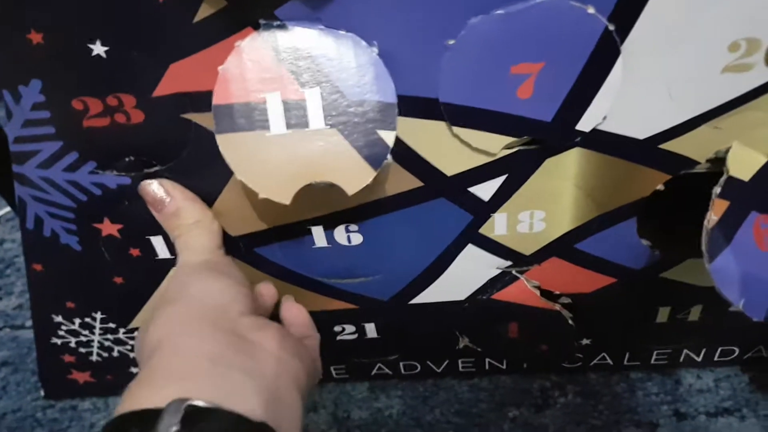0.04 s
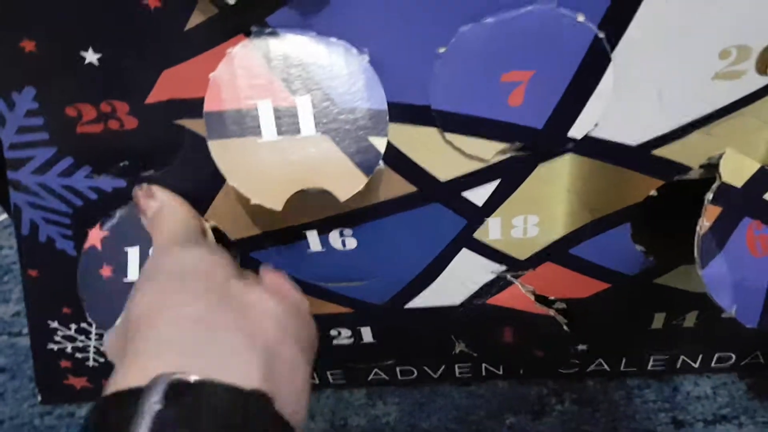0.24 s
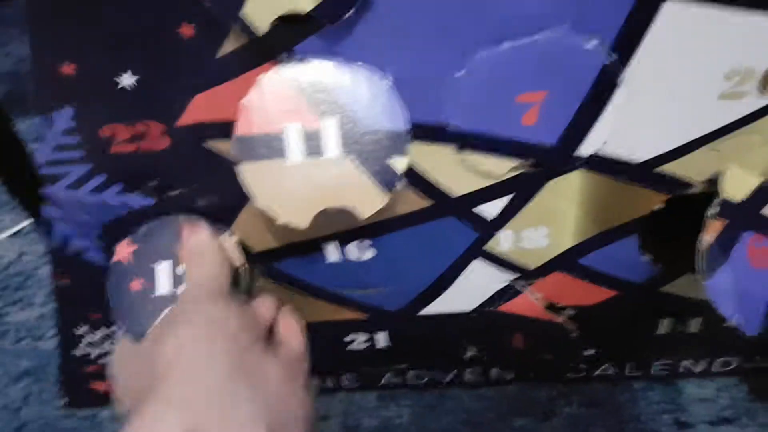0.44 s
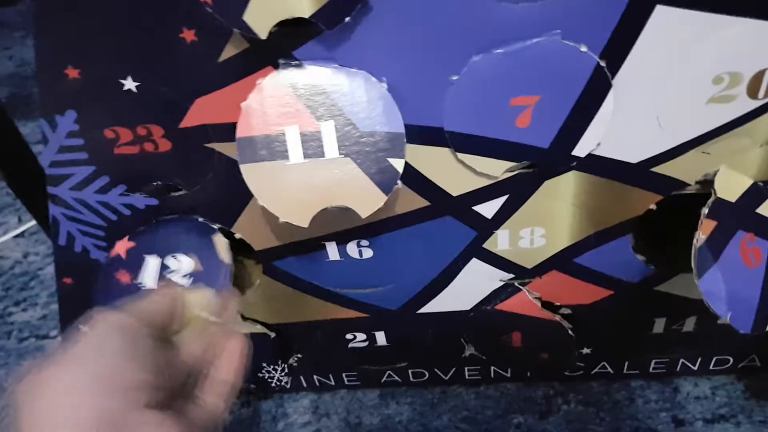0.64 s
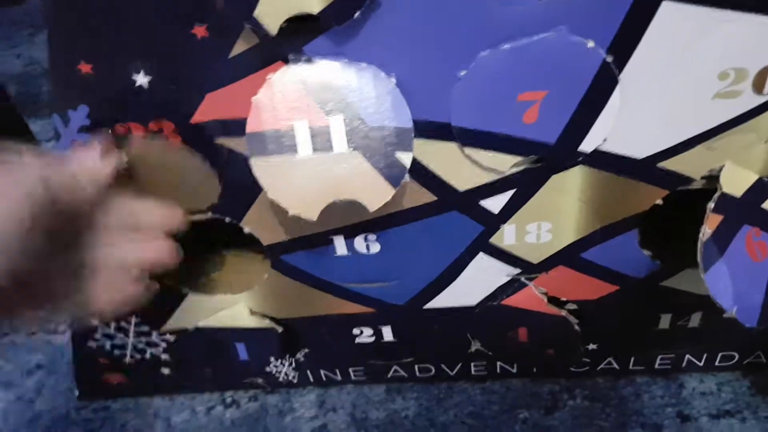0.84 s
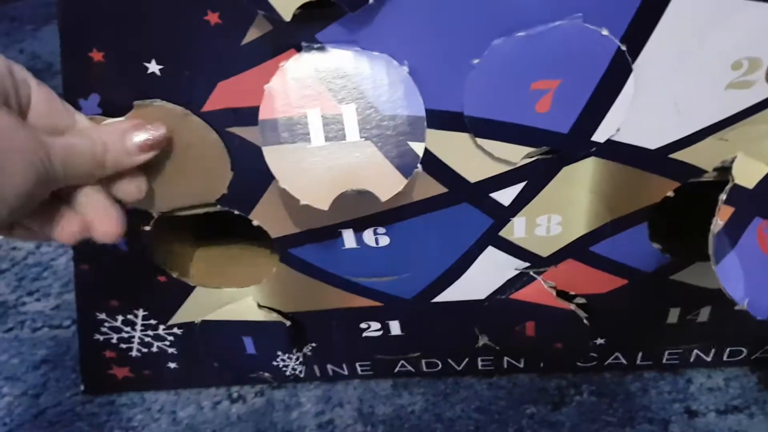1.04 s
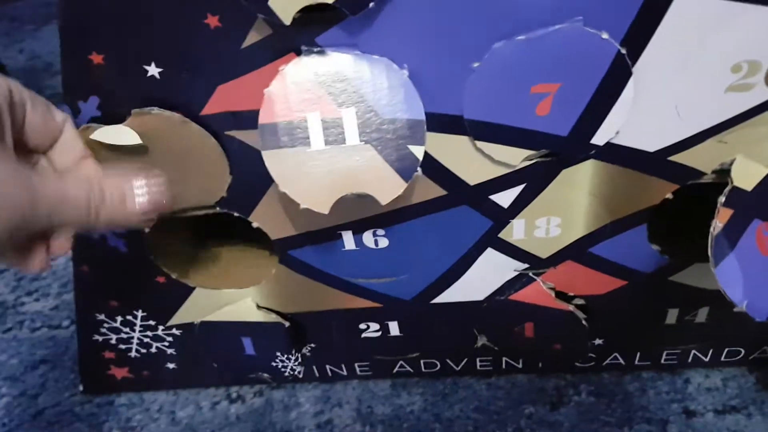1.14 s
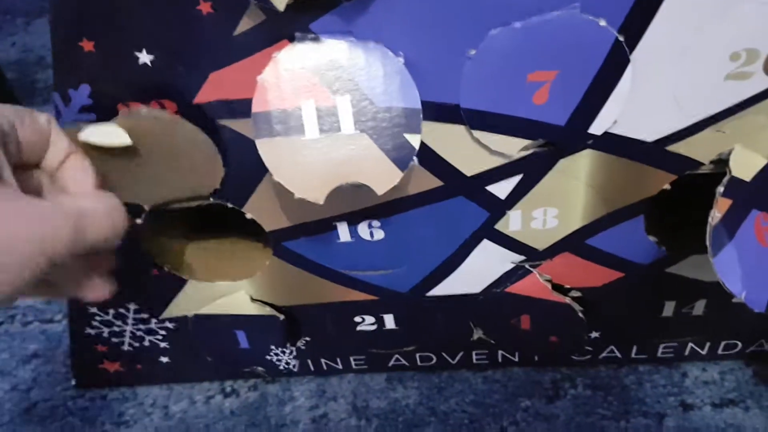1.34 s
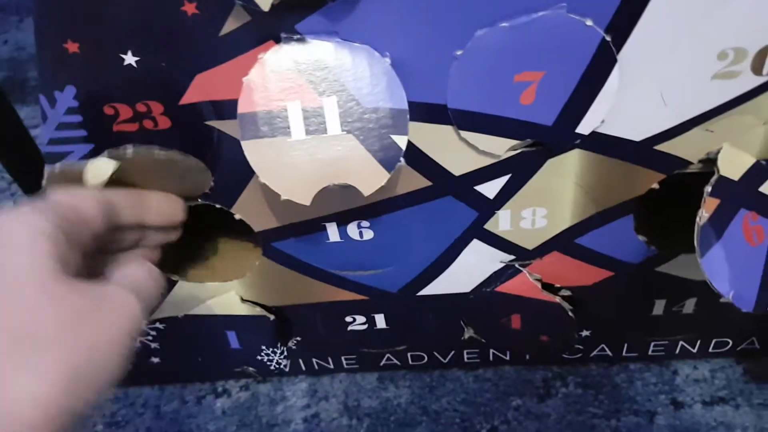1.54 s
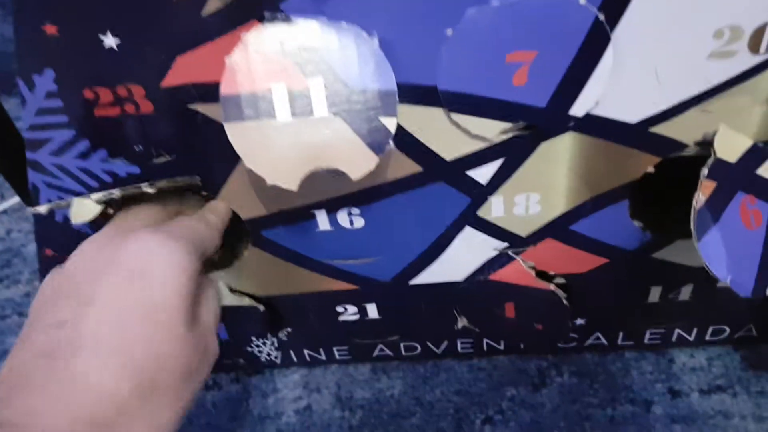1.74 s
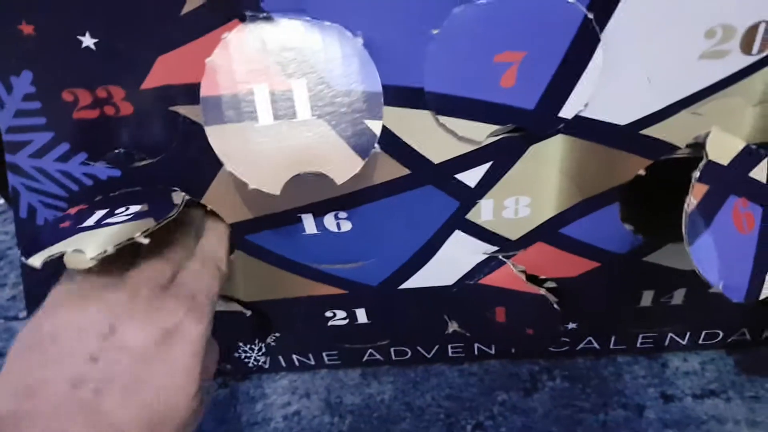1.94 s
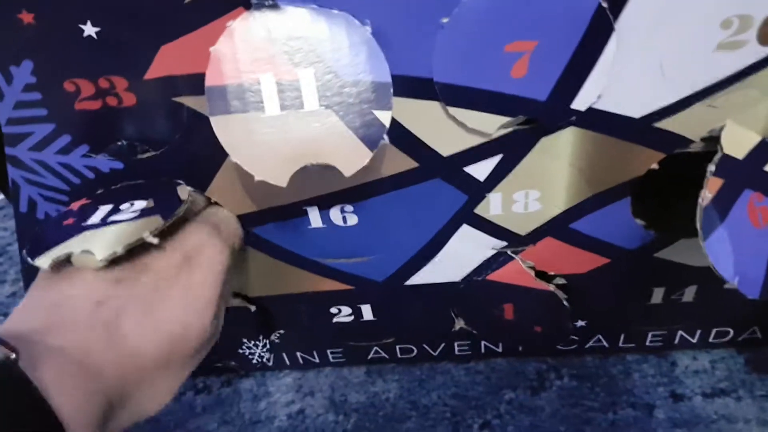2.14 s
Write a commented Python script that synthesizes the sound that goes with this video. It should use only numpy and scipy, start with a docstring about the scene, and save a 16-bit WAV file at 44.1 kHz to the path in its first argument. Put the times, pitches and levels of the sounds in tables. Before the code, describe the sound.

Fingers pop open a perforated cardboard door with a loud crack, then faint knocks and rubbing

```python
"""Fingers pry open a perforated door in a hollow cardboard box, close to a two-port phone microphone.
Light knocks and a rumble come first; within a quarter second the tab pops loudly as knocks and snaps pile up.
Sparse knocks and snapping fibres follow, then fingers slide more strongly on the card until 2.2 s.
Knocks drive panel and cavity modes, snaps are grainy noise bursts, and sliding is coloured noise and modes.
A small carpeted room answers the knocks and snaps briefly."""
import sys
import numpy as np
from scipy import signal
from scipy.fft import rfft, irfft, next_fast_len
from scipy.io import wavfile
from scipy.ndimage import uniform_filter1d

SR = 44100
rng = np.random.default_rng(int(sys.argv[2]) if len(sys.argv) > 2 else 0)


def wrap_up_sound(samples):
    """Save the sound to the file named by the first command line argument, as 16-bit audio."""
    columns = np.atleast_2d(samples).T
    # keep every value between -1 and 1, then stretch to whole-number steps
    tamed = np.clip(columns, -1, 1)
    steps = np.round(tamed * 32767).astype(np.int16)
    wavfile.write(sys.argv[1], SR, steps)


N = 97020  # 2.2 s

# Colour tables hold nominal gains: colour() applies 0.94 of each unless told otherwise.
# small carpeted room: (frequency [Hz], gain [dB])
ROOM_COLOUR = [(60, -4), (300, -4.5), (1200, -4.5), (4000, 5), (9000, -0.5), (16000, -2.5)]
# hand pressing and shifting the box: (time [s], rumble level [dB])
HANDLING = [(0, -44), (.07, -52.5), (.15, -62), (0.329, -43), (.42, -61), (.5, -53), (.57, -69.5),
            (.65, -61), (.735, -47.5), (.77, -61.5), (0.851, -62.5), (0.932, -48.5), (1.05, -53.5),
            (1.101, -60), (1.299, -59), (1.431, -55), (1.549, -53), (1.67, -49), (1.75, -47.5), (1.83, -45),
            (1.949, -41), (2.041, -56), (2.09, -57.5), (2.2, -48)]
# rumble in the box: (frequency [Hz], gain [dB])
RUMBLE_COLOUR = [(20, -9), (59, -6.5), (95, 2), (125, 5.5), (167, 2), (241, 1.5), (295, -12.5), (445, -6.5),
                 (506, -30.5), (600, -20.5), (780, -53), (1320, -120)]
# fingers sliding on card: (time [s], top level [dB], treble level [dB], middle level [dB])
SLIDE = [(0, -69, -79, -56.5), (.08, -78.5, -73.5, -70), (.16, -74.5, -78.5, -66),
         (0.359, -79, -59.5, -61.5), (.47, -73, -79, -65.5), (.53, -84.5, -84, -76),
         (0.601, -83.5, -82, -76), (.64, -74.5, -74, -61.5), (0.759, -68, -70.5, -75.5),
         (.8, -67.5, -67, -59.5), (.87, -63.5, -67, -62), (.95, -64, -69.5, -64),
         (1.061, -69.5, -72, -61.5), (1.087, -82, -80, -72.5), (1.15, -79, -77, -68),
         (1.164, -62, -61.5, -59), (1.185, -64.5, -69.5, -75), (1.21, -75.5, -75, -67),
         (1.269, -75, -64.5, -66), (1.391, -65, -59.5, -61.5), (1.49, -65, -56.5, -60.5),
         (1.52, -57, -59, -58), (1.57, -59.5, -56.5, -63.5), (1.65, -55, -54.5, -51),
         (1.73, -61.5, -56.5, -48), (1.76, -65, -62, -54), (1.788, -62.5, -59.5, -48),
         (1.84, -66.5, -65.5, -55.5), (1.89, -67.5, -69, -55.5), (1.97, -60.5, -66, -43.5),
         (1.999, -90.5, -76.5, -59.5), (2.059, -75.5, -72.5, -74), (2.067, -61, -60.5, -52),
         (2.11, -62, -56, -42), (2.149, -56, -52.5, -50.5), (2.2, -62, -60.5, -47.5)]
# top hiss of the slide: (frequency [Hz], gain [dB])
TOP_COLOUR = [(3820, -35), (5500, -4.5), (6800, -7), (7800, -8.5), (8740, -3), (9270, -3.5), (10000, -3.5),
              (12500, -2), (15700, -3), (15900, -43)]
# treble scrape of the slide: (frequency [Hz], gain [dB])
SCRAPE_COLOUR = [(820, -54), (1400, -24), (1710, -5.5), (2060, -12), (2370, -1), (2670, 1), (2860, -3.5),
                 (3080, -7), (3520, -4.5), (4000, -11), (4970, -12.5), (5350, -17), (7000, -25),
                 (9100, -54)]
# narrow bands of rubbed card: (centre [Hz], noise smoothing [s], mean level [dB])
RUB_BANDS = [(2000, 0.007, -0.5), (2410, .005, -1), (2840, 0.0068, 0.5), (3520, .005, -5),
             (4710, 0.003, -4), (11200, 0.0017, -8), (13600, 0.0025, -5.5)]
# narrow hiss while fingers rub inside the opening: (time [s], level [dB])
WHISPER = [(1.9, -93), (1.93, -59), (1.96, -61.5), (1.99, -78), (2.06, -89), (2.069, -63), (2.11, -56),
           (2.13, -61), (2.155, -56.5), (2.2, -63)]
# box panel modes: (frequency [Hz], relative level [dB], longest decay by 60 dB [s])
PANELS = [(436.5, -11.5, 0.036), (571.3, -5.5, .06), (670.2, -3.5, 0.034), (755, -3.5, 0.077),
          (936.6, 0.5, 0.023), (1023.5, -1.5, 0.035), (1225, 4.5, 0.009), (1394, 0.5, 0.02),
          (1700.4, -6.5, 0.03), (1874, -6.5, 0.027), (1977, -11.5, 0.018), (2166, -18, 0.023),
          (2359, -7.5, 0.02), (2736, -11.5, 0.014), (3194, -16, 0.013)]
# knocks on the box: (time [s], thump peak [dB], thump pitch [Hz], panel peak [dB], thump decay by 60 dB [s],
#   contact time to greatest force [s], panel tilt [dB per octave], favoured panel pitch [Hz])
KNOCKS = [(0.001, -40.5, 184.7, -33.5, 0.1, 0.0012, -15, 775),
          (0.023, -28.5, 287, -35, 0.021, 0.0024, -16, 550),
          (0.047, -37, 252.7, -48.5, 0.039, 0.0018, -4, 550),
          (0.179, -33.5, 312, -35, 0.036, 0.0062, -5, 530), (0.238, -8, 182, 3.5, 0.05, 0.0045, -0.5, 1190),
          (0.247, -8.5, 316, -11, 0.035, 0.0046, -5, 760),
          (0.258, -17.5, 125, -9.5, 0.037, 0.0021, -24, 440),
          (0.273, -13, 196, -4.5, 0.045, 0.0019, 1, 1270),
          (0.305, -29, 127.4, -25.5, 0.047, 0.0021, -10, 610),
          (0.317, -36.5, 155.4, -28.5, 0.08, 0.0044, -3, 1280),
          (0.427, -39, 181.6, -41.5, 0.11, 0.0053, -5.5, 444),
          (0.474, -39.5, 178.1, -46, 0.092, 0.0047, -7, 421),
          (0.623, -51, 136.6, -47, 0.12, 0.003, -1.5, 1037),
          (0.687, -22.5, 390.3, -26, 0.034, 0.0036, 5.5, 1000),
          (0.705, -37.5, 215.4, -44.5, 0.052, 0.0056, -9, 440),
          (0.733, -53.5, 119.4, -37, 0.066, 0.0018, -6, 1050),
          (0.81, -45, 213.5, -35.5, 0.12, 0.0049, 7.5, 770),
          (0.893, -28.5, 182.7, -36.5, 0.088, 0.0031, 8.5, 1310),
          (1, -44.5, 190, -38, 0.08, 0.0033, 2, 1036), (1.03, -43.5, 193.6, -43.5, 0.056, 0.0022, -3, 411),
          (1.176, -51.5, 92.2, -48, 0.18, 0.0058, 3.5, 999),
          (1.599, -35, 135.8, -51, 0.087, 0.0022, 5, 453.6),
          (1.633, -24.5, 167.6, -26.5, 0.14, 0.0057, -1, 1010),
          (1.646, -33, 161.9, -35, 0.29, 0.0025, 7, 1030), (1.699, -31.5, 195.4, -45, 0.1, 0.026, -10, 434),
          (1.724, -31, 201.8, -63, 0.033, 0.0042, 3, 430), (1.782, -35.5, 148.3, -38, 0.2, 0.0068, -6, 440),
          (1.892, -34.5, 235.4, -38, 0.33, 0.018, -6, 1290),
          (1.921, -46.5, 155.3, -12.5, 0.069, 0.0042, 5.5, 945),
          (1.941, -26.5, 228.3, -20, 0.07, 0.00097, -20.5, 393),
          (2.13, -28.5, 248, -32.5, 0.091, 0.015, -10.5, 430)]
# snapping fibres: (time [s], peak [dB], decay to 1/e [s], nominal tilt [dB per octave], favoured pitch [Hz])
SNAPS = [(0.086, -47, 0.0015, 6, 10000), (0.2166, -40.5, 0.0033, -2.5, 4200),
         (0.2377, -14, 0.0054, -4, 2470), (0.241, 0, 0.0024, -2.5, 2360), (.247, -14.5, 0.0048, -5, 4420),
         (0.2716, -12.5, 0.0049, -0.5, 8140), (0.2769, -18, 0.0042, 0, 2580),
         (.389, -46, 0.0016, 10, 12000), (0.404, -47, 0.0016, 2, 11000), (0.4293, -48.5, 0.0018, 4, 11100),
         (0.4667, -45, 0.0022, -3, 2854), (.623, -43.5, 0.0011, 1, 13530), (.6525, -39.5, 0.0022, 1, 13300),
         (0.687, -29.5, 0.0019, 0, 4460), (0.733, -36.5, 0.0021, 1, 2640), (0.8102, -35.5, 0.0017, 3, 9650),
         (0.816, -29, 0.0022, 4.5, 9060), (0.895, -31.5, 0.0021, -3, 3840), (0.965, -41, 0.0045, 2, 4400),
         (1.001, -40, 0.0045, 2, 2307), (1.632, -24.5, 0.00088, 7.5, 15400),
         (1.6335, -19, 0.0015, -1.5, 4840), (1.786, -40, 0.0082, -2, 3000), (1.896, -33.5, 0.0033, 4, 6670),
         (1.9002, -33, 0.0014, -5.5, 3470), (1.923, -31, 0.0031, -5, 8800),
         (2.0668, -44.5, 0.0012, 3.5, 9350)]
# general colour of snaps: (frequency [Hz], gain [dB])
SNAP_COLOUR = [(1000, -33.5), (2000, -1.5), (3000, -7), (4000, -8), (5000, -8), (7300, -15), (10000, -6),
               (13000, -9.5), (15600, -12), (16500, -34.5)]
# port balance, a share added at left and taken off at right: (frequency [Hz], gain [dB])
PORT_BALANCE = [(60, -3), (110, -0.5), (200, -2), (380, 0.5), (700, 1), (1290, -2), (2380, 2.5),
                (4400, 4.5), (8120, 4.5), (15000, 5)]

ROOM_T60_S, TREBLE_T60_S = 0.22, 0.14
ROOM_DB, ROOM_RISE_S = -9.5, 0.0054  # tail level before its colour; time to swell in
# Samples by which left lags right; negative means left hears it first.
THUMP_LAG, PANEL_LAG, SNAP_LAG, SLIDE_LAG = -6, -9.5, -7, -7
# Amplitude of the part that differs between ports: 0 is shared, 1 is unrelated.
RUMBLE_SPREAD, RUB_SPREAD, SLIDE_SPREAD, TOP_SPREAD, SNAP_SPREAD = 0.17, 0.38, 0.72, 1, 0.96
RUB_BANDS_DB, RUB_DRIFT = -4, 0.041  # level against the scrape noise; low-frequency limit of relative wander
WHISPER_HZ, WHISPER_T60_S = 9000, 0.0027
SCATTER_DB, PANEL_TURN_RAD = 3, 0.78  # random panel level; random phase difference between ports
FAVOUR_DB, FAVOUR_OCT = 7, 0.11  # boost around the favoured panel pitch
RING_CYCLES = 55  # longest panel decay by 60 dB, in cycles
THUMP_LATE_S, GRIT = 0.003, 0.98  # thump starts after the panels; noise amplitude in the contact
SNAP_LEAD_S, SNAP_RISE_S = 0.012, 0.0004  # space ahead of the peak; rise from 1/e
SNAP_RING_DB, SNAP_RING_OCT = 8, 0.15  # nominal boost around the favoured snap pitch
MIC_LOW_HZ, MIC_TOP_HZ, BALANCE_SHARE = 49.7, 16300, 0.65


def undb(db):
    """Turn decibels into amplitude."""
    return 10 ** (np.asarray(db, float) / 20)


def unit(x):
    """Scale to an RMS of 1."""
    return x / np.sqrt(np.mean(x ** 2))


def peak(x, db):
    """Scale the largest sample to a level in dB."""
    return x * undb(db) / np.max(np.abs(x))


def colour(x, table, share=0.94):
    """Filter by a share of the (Hz, dB) points, joined on a log axis."""
    points = np.array(table, float)
    size = next_fast_len(x.shape[-1] + 512)
    f = np.arange(size // 2 + 1) * SR / size + 1
    gain_db = share * np.interp(np.log(f), np.log(points[:, 0] + 1), points[:, 1])
    return irfft(rfft(x, size) * undb(gain_db), size)[..., :x.shape[-1]]


def lift(hz, centre_hz, db, octaves):
    """Bell-shaped boost in dB around a centre."""
    return db * np.exp(-0.5 * (np.log2(hz / centre_hz) / octaves) ** 2)


def ring(x, hz, t60, turn=0):
    """One damped mode, its phase turned by some radians."""
    pole = np.exp(2j * np.pi * hz / SR - np.log(1000) / (t60 * SR))
    return (signal.lfilter([1], [1, -pole], x) * np.exp(1j * turn)).imag


def walk(rate):
    """Random levels held 1 / rate s and smoothed twice; RMS near 1."""
    hold = int(SR / rate)
    steps = np.repeat(rng.standard_normal(N // hold + 1), hold)
    return unit(uniform_filter1d(uniform_filter1d(steps, hold), hold)[:N])


def level(table, column):
    """Amplitude over time, joined in dB between the table's points."""
    points = np.array(table).T
    return undb(np.interp(np.arange(N) / SR, points[0], points[column]))


def spread(make, lag, share):
    """Shared sound with a lag plus a part of its own at each port."""
    both = make()
    shared = np.array([np.roll(both, int(lag)), both])
    return shared * np.sqrt(1 - share ** 2) + share * np.array([make(), make()])


def add(out, x, s, lag):
    """Place a sound; one port hears it a few samples late."""
    ports = x * np.ones((2, 1))
    for port, late in enumerate((lag / 2, -lag / 2)):
        i = max(int(round(s * SR + late)), 0)
        out[port, i:i + x.shape[-1]] += ports[port, :N - i]


def room(x):
    """Short diffuse tail, unrelated at the two ports; the treble dies first."""
    t = np.arange(SR // 2) / SR
    noise = rng.standard_normal((2, len(t)))
    low = colour(noise, [(1500, -6.0), (5000, -25.5)])
    tail = low * undb(-60 * t / ROOM_T60_S) + (noise - low) * undb(-60 * t / TREBLE_T60_S)
    tail = tail * np.clip(t / ROOM_RISE_S, 0, 1)
    tail = colour(tail / np.sqrt(np.sum(tail ** 2) / 2), ROOM_COLOUR)
    return undb(ROOM_DB) * signal.fftconvolve(x, tail, axes=1)[:, :N]


def handling():
    """A hand presses and shifts the box: low noise, slightly uneven, rumbles in the cavity."""
    lumps = undb(1.2 * walk(40))

    def rumble():
        return unit(colour(rng.standard_normal(N) * lumps, RUMBLE_COLOUR))

    return spread(rumble, THUMP_LAG, RUMBLE_SPREAD) * level(HANDLING, 1)


def rub_bands(grain):
    """Narrow bands of the rubbed card; each wanders in pitch and strength as the finger moves."""
    out = 0
    for hz, smooth, db in RUB_BANDS:
        band = unit(uniform_filter1d(rng.standard_normal(N) * grain, int(smooth * SR)))
        strength = undb(db + 2.5 * walk(3))
        # high bands wander by a smaller share
        pitch = hz * (1 + RUB_DRIFT * walk(5.3) * 2000 / (hz + 2000))
        out = out + strength * band * np.sin(2 * np.pi * np.cumsum(pitch) / SR)
    return unit(out)


def sliding_fingers():
    """Skin drags over card: noise of one shared grain hisses, scrapes and rings the panels."""
    grain = undb(0.75 * walk(47) + 0.46 * walk(330))

    def friction():
        return rng.standard_normal(N) * grain

    def top():
        return unit(colour(friction(), TOP_COLOUR))

    def scrape():
        return unit(colour(friction(), SCRAPE_COLOUR)) + undb(RUB_BANDS_DB) * rub_bands(grain)

    def panel_rub():
        # the finger damps the lowest ten panel modes to a fifth of their decay
        return unit(sum(undb(db) * ring(friction(), hz, 0.2 * t60) for hz, db, t60 in PANELS[:10]))

    def whisper():
        once = ring(friction(), WHISPER_HZ, WHISPER_T60_S)
        return unit(ring(once, WHISPER_HZ, WHISPER_T60_S))

    out = spread(top, SLIDE_LAG, TOP_SPREAD) * level(SLIDE, 1)
    out = out + spread(scrape, SLIDE_LAG, SLIDE_SPREAD) * level(SLIDE, 2)
    out = out + spread(panel_rub, SLIDE_LAG, RUB_SPREAD) * level(SLIDE, 3)
    return out + spread(whisper, SLIDE_LAG, SLIDE_SPREAD) * level(WHISPER, 1)


def cavity_thump(t, rough, hz, t60):
    """A short push and the rough contact ring three damped modes of the box cavity."""
    push = np.sin(2 * np.pi * hz * t) * np.clip(1.5 - t * hz, 0, 1) * np.minimum(t * hz, 1)
    push = push + 1.1 * rough
    return ring(push, hz, t60) + 0.5 * ring(push, hz * 1.5, t60 * 1.2) + 0.5 * ring(push, hz * 0.7, t60)


def panel_ring(t, noise, swell, tilt_db, near_hz):
    """Rough contact force rings the panel modes, most strongly around the favoured pitch."""
    out = 0
    for hz, db, t60 in PANELS:
        scatter, detune, phase, turn = rng.standard_normal(4)
        hz = hz * (1 + 0.012 * detune)
        force = swell * (GRIT * noise + 0.22 * np.sin(2 * np.pi * (hz * t + phase)))
        port_turn = PANEL_TURN_RAD * turn * np.array([[0.5], [-0.5]])
        mode = ring(force, hz, min(t60, RING_CYCLES / hz), port_turn)
        mode_db = db + tilt_db * np.log2(hz / 1000) + SCATTER_DB * scatter
        out = out + peak(mode, mode_db + lift(hz, near_hz, FAVOUR_DB, FAVOUR_OCT))
    return signal.sosfilt(signal.butter(3, 3600, fs=SR, output="sos"), out)


def knocks():
    """Each rough contact swells into the panel modes; the box cavity thumps just after."""
    out, t = np.zeros((2, N)), np.arange(8192) / SR
    for s, thump_db, hz, ring_db, t60, contact, tilt_db, near_hz in KNOCKS:
        noise = rng.standard_normal(len(t))
        u = t / contact
        swell = u ** 3 * np.exp(-3 * u)
        thump = cavity_thump(t, noise * swell, hz, t60)
        panel = panel_ring(t, noise, swell, tilt_db, near_hz)
        add(out, peak(thump, thump_db), s + THUMP_LATE_S, THUMP_LAG)
        add(out, peak(panel, ring_db), s, PANEL_LAG)
    return out


def snaps():
    """A grainy burst of tearing fibres that builds up quickly to its peak and dies away."""
    out, t = np.zeros((2, N)), np.arange(4096) / SR - SNAP_LEAD_S
    grid = np.geomspace(1000, 20000, num=60)
    for s, db, decay, tilt_db, hz in SNAPS:
        noise = rng.standard_normal((3, len(t)))
        ports = noise[0] * np.sqrt(1 - SNAP_SPREAD ** 2) + SNAP_SPREAD * noise[1:]
        # each grain holds a random level for 16 samples
        grains = ports * undb(4.7 * rng.standard_normal(len(t) // 16).repeat(16))
        shape = np.exp(np.where(t < 0, t / SNAP_RISE_S, -t / decay))
        burst = colour(grains * shape, SNAP_COLOUR)
        burst = colour(burst, [(1500, -2 * tilt_db), (6000, 0.0042), (24000, 2 * tilt_db)])
        burst = colour(burst, np.c_[grid, lift(grid, hz, SNAP_RING_DB, SNAP_RING_OCT)])
        add(out, peak(burst, db), s - SNAP_LEAD_S + SNAP_RISE_S, SNAP_LAG)
    return out


def scene():
    """Knocks and snaps with their room tail, over handling and sliding heard directly."""
    hits = knocks() + snaps()
    return room(hits) + handling() + sliding_fingers() + hits


def record(dry):
    """Microphone: the left port is brighter, deep bass is lost, peaks are rounded and the top is cut."""
    left = colour(dry[0], PORT_BALANCE, BALANCE_SHARE)
    right = colour(dry[1], PORT_BALANCE, -BALANCE_SHARE)
    x = np.array([left, right])
    x = signal.sosfilt(signal.butter(2, MIC_LOW_HZ, "high", fs=SR, output="sos"), x)
    rounded = np.tanh(1.09 * x) / 1.078
    return signal.sosfilt(signal.ellip(8, 0.2, 70, MIC_TOP_HZ, fs=SR, output="sos"), rounded)


dry = scene()
out = record(dry)
wrap_up_sound(out)
```